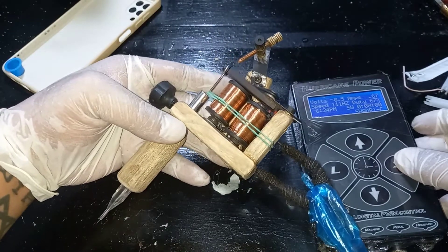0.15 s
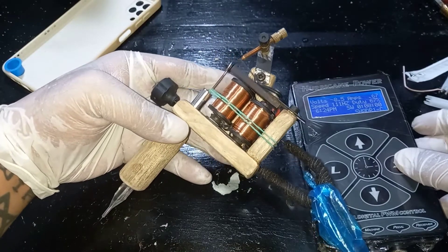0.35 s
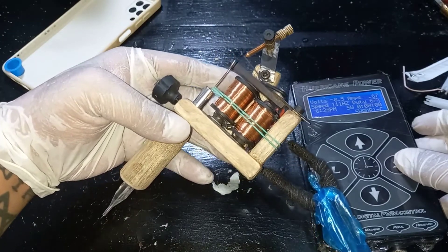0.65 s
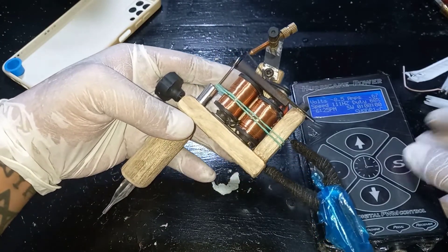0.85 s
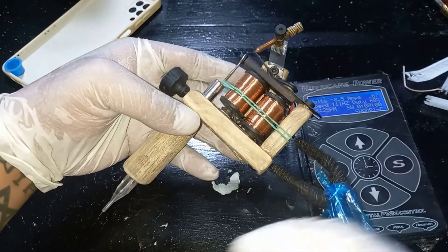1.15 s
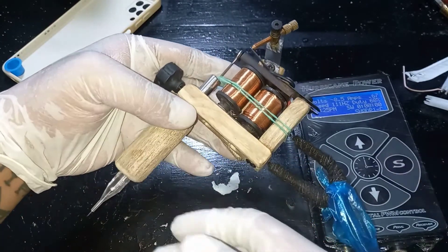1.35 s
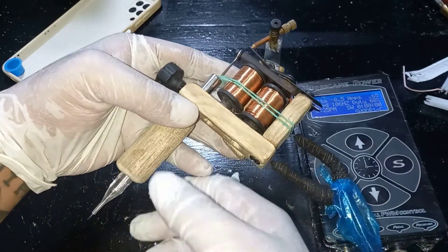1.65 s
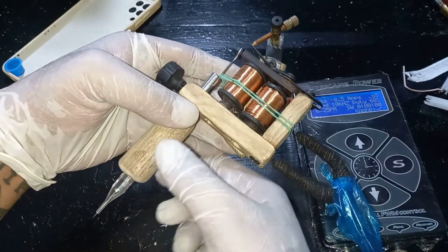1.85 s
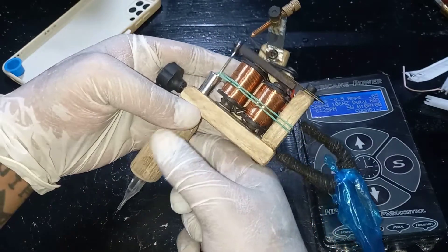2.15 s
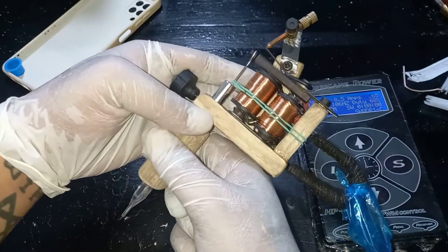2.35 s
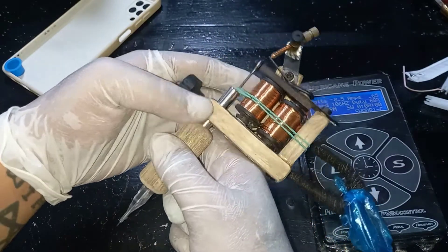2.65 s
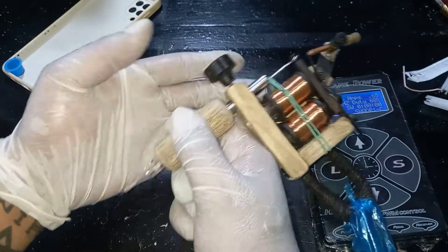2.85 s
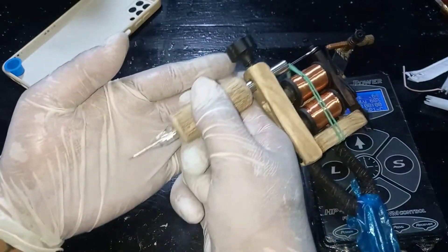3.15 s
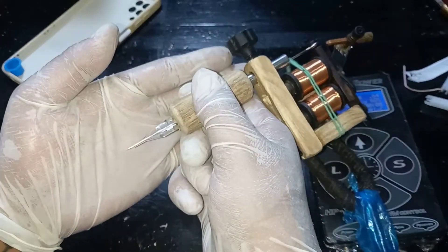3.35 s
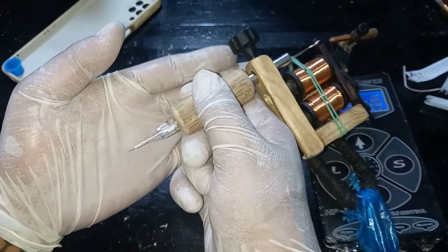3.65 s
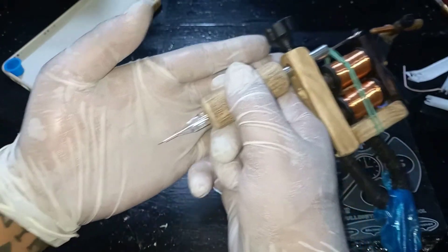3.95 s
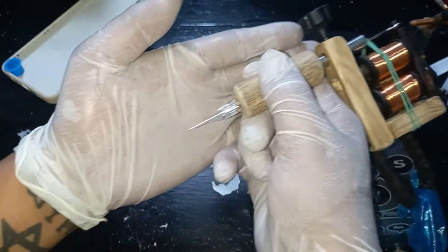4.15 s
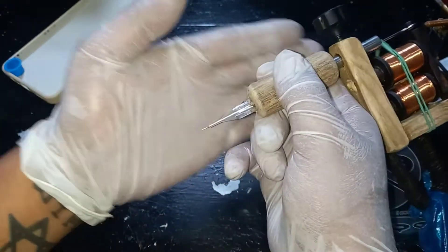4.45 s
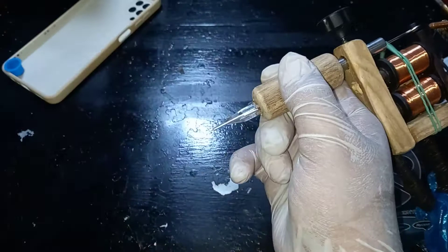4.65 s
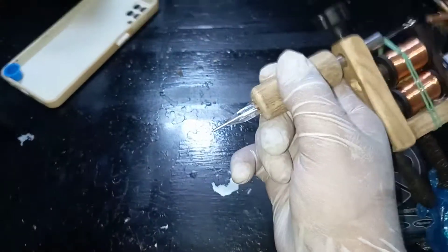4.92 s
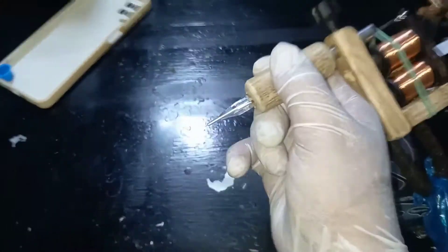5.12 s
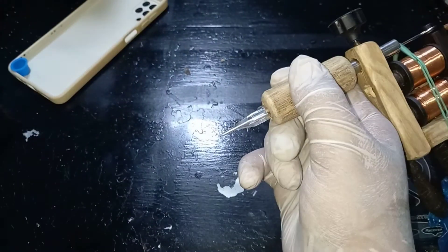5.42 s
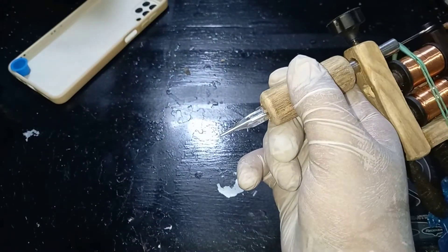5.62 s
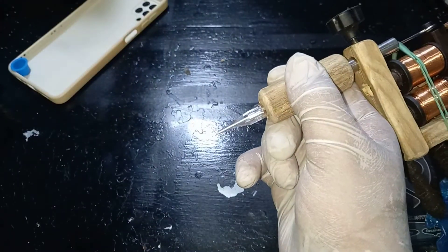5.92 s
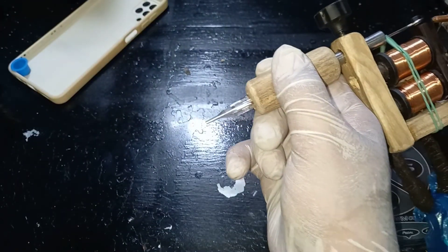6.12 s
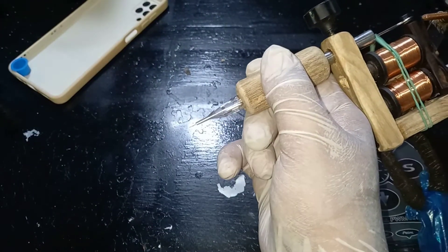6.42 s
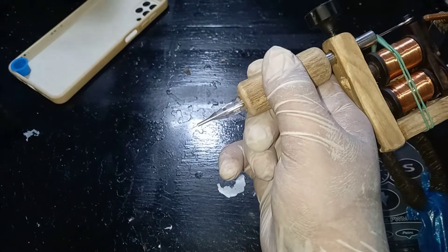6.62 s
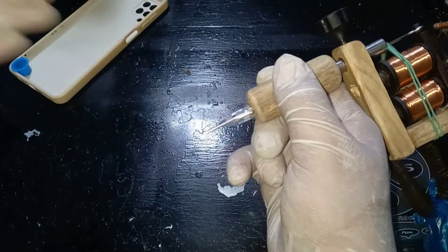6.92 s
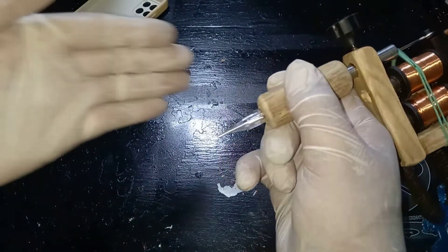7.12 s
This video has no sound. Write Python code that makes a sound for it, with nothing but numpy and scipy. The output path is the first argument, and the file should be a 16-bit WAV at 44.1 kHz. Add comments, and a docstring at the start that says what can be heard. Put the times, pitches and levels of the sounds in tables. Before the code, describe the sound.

From 0 s a coil tattoo machine is already running close to the microphone, a hard, raspy buzz of about 107 strikes a second with low hum beneath and a strong, bright metallic sizzle above. Around 1-1.3 s it is tilted and the colour shifts, a thin high whine of the frame sliding down and up again until about 2.5 s. From 2.5 to 3.2 s the other hand takes and turns it; the buzz sags to about 102 a second and the sizzle flares briefly, then weakens. Until 4.4 s it holds a thinner tone, then from 4.7 s, firmly gripped, the hum drops and the buzz stays steady, with small swells of rattle. One dull, soft knock on the bench falls at 4.9 s. Irregular puffs of low air rumble and faint hoots touch the microphone throughout. The room is quiet; the buzz continues to the end at 7.3 s.

```python
"""A coil tattoo machine buzzes in the hand over a workbench, close to the microphone. Its armature strikes the
coil cores a little over 100 times a second; each blow rings spring and frame. The machine is turned and gripped
by the other hand, which slows it and changes its colour. A draught buffets the microphone with rumble and
flutter; now and then narrow bands of noise hoot faintly. One dull knock on the bench is a scuff of noise with
decaying modes; a quiet room noise lies under all."""
import sys
import numpy as np
from scipy import signal
from scipy.fft import rfft, irfft
from scipy.io import wavfile
from scipy.ndimage import uniform_filter1d

SR = 44100
rng = np.random.default_rng(int(sys.argv[2]) if len(sys.argv) > 2 else 0)


def persist_wave(psi):
    """Save psi, clipped to +-1, as 16-bit WAV."""
    counts = np.round(np.clip(psi, -1, 1) * 32767).astype(np.int16)
    wavfile.write(sys.argv[1], SR, np.atleast_2d(counts).T)


N = 321048
TIME = np.arange(N) / SR

# how the machine is held, gliding between holds: t/s, hold (0 side on, 1 tilted, 2 turning, 3 palm, 4 gripped)
HOLD_CURVE = [(1.0, 0), (1.25, 1), (2.35, 1), (2.75, 2), (3.2, 3), (4.4, 3), (4.7, 4)]
# the hand is never quite still, so the beamed rings swell and fade
SWAY_PER_S, RATTLE_SWAY_DB, RING_SWAY_DB = 15, .45, .5
# borders of the bands: clang of the needle bar, then rings of frame and spring
CLANG_FROM_HZ, CLANG_TO_HZ, FRAME_HZ, SPRING_HZ = 1900, 3150, 7600, 12000


def amp(db):
    """Decibels to gain."""
    return 10 ** (np.asarray(db) / 20)


def unit(x):
    """Scales to rms 1."""
    return x / np.sqrt(np.mean(x ** 2) + 1e-20)


def follow(rows, axis=1):
    """One column of a curve at every sample."""
    rows = np.asarray(rows, float)
    return np.interp(TIME, rows[:, 0], rows[:, axis])


def causal(gain):
    """Gives a magnitude response the phase of a real resonator, which rings only after the blow."""
    lags = irfft(np.log(gain + 1e-6))
    half = lags.shape[-1] // 2
    fold = np.r_[1, np.full(half - 1, 2), 1, np.zeros(half - 1)]
    return np.exp(rfft(lags * fold))


def tint(x, points):
    """Filters by a spectrum of (f/Hz, gain/dB) points, joined along log frequency."""
    hz, db = np.transpose(points)
    grid = np.fft.rfftfreq(8192, 1 / SR)
    gain = amp(np.interp(np.log(grid + 1), np.log(hz + 1), db))
    return signal.oaconvolve(np.atleast_2d(x), irfft(causal(gain))[None], axes=1)[:, :N]


def cut(x, hz, kind, order=8):
    """High-pass or low-pass without delay."""
    return signal.sosfiltfilt(signal.butter(order, hz, kind, fs=SR, output="sos"), x)


def resonate(x, hz, width_hz):
    """A resonance that follows a curve of pitch: shift down to zero, smooth, shift back up."""
    turn = np.exp(2j * np.pi * np.cumsum(hz) / SR)
    r = np.exp(-np.pi * width_hz / SR)
    return 2 * (turn * signal.lfilter([1 - r], [1, -r], x / turn)).real


def steady(x, size=4400):
    """Holds the short-time rms of the middle of a pair at 1."""
    power = uniform_filter1d(uniform_filter1d(x.mean(0) ** 2, size), size)
    return x / np.sqrt(abs(power) + 1e-14)


def wander(per_s):
    """Slow chance of rms 1, with per_s random knots a second joined by straight lines."""
    knots = rng.standard_normal(2000)
    return unit(np.interp(TIME * per_s, np.arange(len(knots)), knots))


def air(colour, alike):
    """Coloured noise at two microphone ports; alike is the shared part of the power."""
    shared, left, right = rng.standard_normal((3, N))
    alike = np.clip(alike, 0, 1)
    return tint(np.sqrt(alike) * shared + np.sqrt(1 - alike) * np.array([left, right]), colour)


def blows(turns, scatter_db, jitter_us):
    """One sharp click at each whole turn, each a little different in force and time."""
    at = np.interp(np.arange(1, int(turns[-1])), turns, np.arange(N))
    force, slip = rng.standard_normal((1000, 2))[:len(at)].T
    at = at + slip * jitter_us * SR / 1e6
    # a windowed sinc places each click between samples
    index = at.astype(int)[:, None] + np.arange(-16, 17)
    offset = index - at[:, None]
    click = np.sinc(offset) * np.cos(np.pi * offset / 36) ** 2
    clicks = amp(scatter_db * force)[:, None] * click
    return np.bincount(np.clip(index, 0, N - 1).ravel(), clicks.ravel(), N)


def quiet_room():
    """A steady bed of soft, darkened noise, half shared by the two ports."""
    room_colour = [(300, 0), (1500, -8), (15000, -25)]  # spectrum of the room: f/Hz, gain/dB
    return amp(-48) * unit(air(room_colour, alike=.5))


def knocks(scuff_db=-7, scuff_s=0.005):
    """A dull blow of the hand or cord scuffs the bench and rings its modes, which die away exponentially."""
    # knocks on the bench: t/s, level/dB
    knock_rows = [(4.941, -25)]
    # modes of the bench: f/Hz, level against the knock/dB, t60/s
    bench_modes = [(215, -1, .1), (335, 0, .07), (450, -2, .05), (850, -7, .03)]
    out = np.zeros(N)
    scuff = cut(rng.standard_normal(N), 1300, "low", order=2)
    scuff = unit(cut(scuff, 210, "high", order=2))
    for s, db in knock_rows:
        t = np.maximum(TIME - s, 0)
        for hz, mode_db, t60 in bench_modes:
            decay_db = 60 * np.minimum(t / t60, 3)
            out += amp(db + mode_db - decay_db) * np.sin(2 * np.pi * hz * t)
        out += amp(db + scuff_db) * scuff * (t > 0) * np.exp(-t / scuff_s)
    return out * amp([[0], [-4]])  # softer at the right port


def hoots(width_hz=45):
    """A narrow, unsteady band of noise hoots briefly."""
    # faint low hoots, narrow bands of noise: start/s, end/s, f/Hz, level at the top of the swell/dB
    hoot_rows = [(0.033, 0.287, 218, -38.5), (1.874, 2.11, 230, -36.5), (2.92, 3.26, 247, -34.5),
                 (4.052, 4.404, 151.6, -39.5), (4.27, 4.48, 342, -42), (4.52, 4.864, 310, -38.5)]
    out = np.zeros(N)
    for start, end, hz, db in hoot_rows:
        swell = np.sin(np.pi * np.clip((TIME - start) / (end - start), 0, 1))
        pitch = np.full(N, hz)
        hollow = resonate(rng.standard_normal(N), pitch, width_hz)
        hollow = resonate(hollow, pitch, width_hz)
        out += amp(db) * swell * steady(hollow[None])[0]
    return out


def puff(start, length, db, attack_s=0.01, release_s=0.0046):
    """Strength of one puff: it rises, holds and dies away."""
    t = TIME - start
    return amp(db) * np.clip(t / attack_s, 0, 1) * np.exp(-np.maximum(t - length, 0) / release_s)


def draught(turns):
    """Puffs of low rumble that throb in step with the blows, with a higher flutter of their own."""
    # separate puffs of air on the microphone: start/s, length/s, strength before the lumps/dB
    puff_rows = [(0.0, 0.027, -41.5), (0.177, 0.062, -38.5), (0.587, 0.06, -23.5), (0.68, 0.13, -35.5),
                 (0.961, 0.092, -34), (1.146, 0.12, -28), (1.281, 0.23, -27.5), (1.633, 0.12, -30.5),
                 (1.784, 0.17, -33.5), (1.993, .12, -39), (2.225, 0.13, -26.5), (2.46, 0.065, -31.5),
                 (2.62, 0.14, -29.5), (2.774, 0.21, -32), (3.055, 0.25, -34.5), (3.467, 0.22, -39),
                 (3.733, 0.082, -35.5), (3.887, 0.093, -33), (4.293, 0.35, -33.5), (4.778, 0.45, -37.5),
                 (5.344, .08, -32), (5.44, 0.26, -38.5), (5.692, 0.34, -36.5), (6.038, 0.24, -32.5),
                 (6.332, 0.2, -32), (6.56, 0.15, -36), (6.878, 0.12, -37.5), (7.18, .055, -39.5)]
    # the breeze under the puffs: t/s, strength before the lumps/dB
    breeze_curve = [(0, -35.5), (.4, -56), (1.1, -46.5), (7.28, -40.5)]
    # spectra of the thump and of the flutter: f/Hz, gain/dB
    gust_colour = [(20, -26), (60, -1.5), (100, 4.5), (150, -4), (220, -26), (900, -55)]
    flutter_colour = [(100, -63.5), (200, 6), (250, 0), (340, -4.5), (450, -20.5), (1500, -58)]
    # eddies break the wind into lumps with short lulls; a light breeze more so than a puff (depths 0-1)
    eddies_per_s, puff_depth, breeze_depth = 30, .6, .85
    # the rumble that throbs with the blows, against its random part
    throb_db = -6
    # flutter level at the usual wind, and dB gained per dB of wind: it grows more slowly than the thump
    flutter_db, usual_wind_db, flutter_growth = -41.5, -35, 0.56

    eddies = abs(wander(eddies_per_s))
    puff_lumps = unit(1 + puff_depth * (eddies - 1))
    breeze_lumps = unit(1 + breeze_depth * (eddies - 1))
    puffs = puff_lumps * sum(puff(*row) for row in puff_rows)
    wind = np.hypot(puffs, breeze_lumps * amp(follow(breeze_curve)))

    throb = tint(blows(turns, scatter_db=4, jitter_us=300), gust_colour)
    throb = unit(cut(throb, 40, "high", order=2))
    rumble = unit(air(gust_colour, alike=0.22)) + amp(throb_db) * throb
    gusts = wind * steady(rumble, size=800)
    flutter_strength = amp(flutter_db) * (wind / amp(usual_wind_db)) ** flutter_growth
    flutter = flutter_strength * steady(air(flutter_colour, alike=0.23))
    return gusts * amp([[-.8], [.8]]) + flutter  # the thump leans to the right


def hum(turns, port_turn=0.09, spread=.11):
    """The blows shake the whole frame: low harmonics, rebalanced and mostly damped by a firm grip."""
    # harmonics: multiple of the speed, level held loosely/dB, level held firmly/dB (before the hum's gain)
    harmonics = [(4, -53, -53.5), (5, -59, -64), (6, -59, -66), (7, -50, -54), (8, -51, -48.5),
                 (9, -47, -60), (10, -48.5, -55), (12, -51.5, -54), (14, -58, -61), (15, -60, -58)]
    # gain of the whole hum: t/s, gain/dB
    hum_gain = [(0, -1), (2.35, 1), (4.3, -.5), (4.7, -5.5), (6.2, -4), (7.28, -6.5)]
    rough_depth, rough_per_s = .15, 200  # each harmonic trembles
    firm = np.clip(follow(HOLD_CURVE) - 1, 0, 1)
    out = np.zeros((2, N))
    for k, loose_db, firm_db in harmonics:
        height = amp(loose_db + firm * (firm_db - loose_db)) * (1 + rough_depth * wander(rough_per_s))
        # the ports differ more for short waves
        lag = port_turn * np.array([[1], [-1]]) * k / len(harmonics)
        # the frame passes each harmonic on a little early or late
        late = spread * rng.standard_normal()
        out -= height * np.sqrt(2) * np.cos(2 * np.pi * (k * turns + lag + late))
    return out * amp(follow(hum_gain))


def ring_shape(size=4096):
    """Amplitude after a blow: a crack of half a millisecond, then steel, bench and room ring on."""
    t = np.arange(size) / SR - .001  # the crack peaks 1 ms (44 samples) in
    after = np.maximum(t, 0)
    # these three are powers
    crack = np.exp(-(t / .00044) ** 2)
    steel = amp(2 * -9) * np.exp(-after / .0018)
    room = amp(2 * -26.5) * np.exp(-after / .03)
    return np.sqrt(crack + (t > 0) * (steel + room))


def radiate(clicks, patchy_db=1.4, count=48, size=8192):
    """Dense steel modes and reflections: some last, the rest drift as the hand moves."""
    shape = ring_shape()
    lasting = .5  # share of the power
    noise = rng.standard_normal((count + 1, 2, len(shape)))
    mixed = np.sqrt(lasting) * noise[0] + np.sqrt(1 - lasting) * noise[1:]
    paths = rfft(shape * mixed, size)
    # flatten the broad colour and leave the fine modes
    paths /= causal(np.sqrt(uniform_filter1d(abs(paths) ** 2, size=70)))
    # finger pressure damps now one group of modes, now another
    patches = unit(uniform_filter1d(rng.standard_normal((count, 1, paths.shape[-1])), size=90))
    paths = irfft(paths * causal(amp(patchy_db * patches)), size)
    paths = np.roll(paths, 64, -1)[..., :len(shape)]
    # glide from one set of modes to the next
    place, out = np.linspace(0, count - 1, N), np.zeros((2, N + size))
    for k, path in enumerate(paths):
        a, b = np.searchsorted(place, [k - 1, k + 1])
        fade = np.cos(np.pi / 2 * (place[a:b] - k))
        part = signal.fftconvolve((clicks[a:b] * fade)[None], path, axes=1)
        out[:, a:a + part.shape[1]] += part
    # the crack lands on the click, and reaches the right port 8 samples later
    return unit(np.array([out[0, 108:108 + N], out[1, 100:100 + N]]))


def strike(turns, return_db=-17, early_db=-5):
    """The armature hits the cores, bounces once, and springs back against the contact screw."""
    # loose parts rasp most in the middle range: f/Hz, gain against the blows/dB
    chatter_colour = [(1500, -8), (7000, -3), (12000, -8)]
    # below the frame's ring each crack is double: a duller crack leads by a slightly varying part of a cycle
    early_lead, lead_wobble = .035, .08  # lead in cycles, and the share by which it varies
    down = blows(turns, scatter_db=.9, jitter_us=5)
    early_turns = turns + early_lead * (1 + lead_wobble * wander(30))
    early_crack = blows(early_turns, scatter_db=2, jitter_us=8)
    # bounce and return, in cycles after the blow
    back = sum(blows(turns - part, scatter_db=3, jitter_us=20) for part in (.27, .78))
    # needle bar and loose parts rasp anew after each blow and never quite come to rest
    shaken = abs(signal.oaconvolve(down ** 2, ring_shape() ** 2)[40:40 + N])
    rasp = unit(np.sqrt(shaken + .45 * shaken.mean()) * rng.choice([-1, 1], (2, N)))
    hits = radiate(down + amp(early_db) * cut(early_crack, FRAME_HZ, "low"))
    return hits + amp(return_db) * radiate(back, count=12) + tint(rasp, chatter_colour)


def colour_by_hold(steel, hold):
    """Each hold shows another side of the machine, so the blows glide from colour to colour."""
    # colour of the blows in each hold, from side on to gripped: f/Hz, gain/dB
    side_on = [(1700, -9.5), (2650, 2), (3100, -11.5), (4050, 6), (4550, -1.5), (5200, -3), (5950, 1.5),
               (7100, -10.5), (8900, 3.5), (9900, 14.5), (11800, 7.5), (13100, 8.5), (15700, 7)]
    tilted = [(1650, -13.5), (2750, 5.5), (3100, -8), (3750, 2.5), (4750, -1.5), (6100, 3), (7250, -11),
              (8500, 9), (10300, 9), (12000, 0), (13050, 5.5), (13900, 0), (15000, 1)]
    turning = [(2400, -9), (2950, -10), (4600, 0), (5300, 3), (5900, -9), (7200, -7), (8700, 4),
               (11300, -9), (12500, 2), (14000, -1), (15700, -3)]
    on_palm = [(1650, -15.5), (1900, 0), (2850, 0.5), (3400, -11.5), (4300, 2.5), (6000, -12), (7400, -9),
               (7900, 0.5), (11500, 0.5), (12300, 8), (13600, 5.5), (15700, -4)]
    gripped = [(1750, -17), (2050, -2.5), (2600, -4.5), (3100, -11.5), (4650, -1), (5600, -13.5),
               (7000, -11.5), (7900, 0), (9450, 2), (9850, -2.5), (10600, 4), (11700, 2.5), (12500, 11.5),
               (13700, 7.5), (14300, 6), (15700, -4.5)]
    colours = [side_on, tilted, turning, on_palm, gripped]
    return sum(np.maximum(1 - abs(hold - k), 0) * unit(tint(steel, colour))
               for k, colour in enumerate(colours))


def beam(ring, db):
    """Holds one ring at its level, swaying a little with the hand."""
    return amp(db + RING_SWAY_DB * wander(SWAY_PER_S)) * steady(ring)


def rattle(turns, whine_width_hz=1500):
    """The struck steel, split into body, clang and the beamed rings of frame and spring."""
    # level of the frame's ring in each hold, in hold order: level/dB
    frame_levels = [-25, -27.5, -24.5, -29, -28]
    # rattle of the body, outside the clang and below the frame's ring: t/s, level/dB
    body_curve = [(0.6, -30), (1.1, -28.5), (2.2, -28.5), (2.9, -33), (4.2, -32), (5.4, -32.5),
                  (6.25, -36.5), (6.6, -31.5)]
    # metallic band between about 2 and 3 kHz: t/s, level/dB
    clang_curve = [(0.0, -37), (0.75, -42), (2.4, -36), (2.75, -44.5), (4.4, -34.5), (4.7, -39),
                   (5.25, -43.5), (5.75, -37.5), (6.3, -36), (6.55, -44), (7.0, -39.5)]
    # a narrow ring of the frame slides as the machine is tilted and turned: t/s, f/Hz, level/dB
    whine_curve = [(0.9, 9270, -27.5), (1.6, 8550, -35), (1.92, 9250, -28.5), (2.2, 9650, -29),
                   (2.48, 8600, -36.5), (2.75, 9200, -35), (3.3, 9300, -48)]
    # the spring's ring above 12 kHz: t/s, level/dB
    spring_curve = [(0.0, -18.5), (0.99, -19), (1.88, -20.5), (2.51, -16), (2.72, -22.5), (2.84, -19.5),
                    (3.0, -23.5), (4.74, -23), (5.09, -22.5), (5.21, -25), (5.33, -22.5), (5.84, -24.5),
                    (6.63, -21.5), (7.28, -26)]

    steel = strike(turns)
    hold = follow(HOLD_CURVE)
    sound = colour_by_hold(steel, hold)
    low, spring = cut(sound, FRAME_HZ, "low"), cut(sound, SPRING_HZ, "high")
    frame = sound - low - spring
    clang = cut(cut(low, CLANG_TO_HZ, "low"), CLANG_FROM_HZ, "high")
    body = cut(low - clang, 600, "high", order=2)
    whine_hz = follow(whine_curve)
    whine = resonate(resonate(steel, whine_hz, whine_width_hz), whine_hz, whine_width_hz)

    frame_db = np.interp(hold, np.arange(len(frame_levels)), frame_levels)
    rings = beam(frame, frame_db) + beam(whine, follow(whine_curve, axis=2))
    rings = rings + beam(spring, follow(spring_curve))
    middle = beam(body, follow(body_curve)) + beam(clang, follow(clang_curve))
    # the rings lean more and more to the left
    lean_db = follow([(1.5, .35), (4, 1)])
    return amp(RATTLE_SWAY_DB * wander(SWAY_PER_S)) * (middle + rings * amp([lean_db, -lean_db]))


def scene():
    """The machine, the draught, hoots, a knock and a quiet room."""
    # speed of the armature, before a slight unsteadiness: t/s, rate/(blows/s)
    speed_curve = [(0.0, 106.73), (0.3, 107.04), (0.8, 107.06), (1.5, 106.35), (2.2, 107.28),
                   (2.45, 107.13), (2.57, 104.69), (2.9, 103.62), (3.12, 101.95), (3.6, 101.64),
                   (4.15, 102.18), (4.55, 101.66), (6.0, 101.46), (6.75, 101.31), (7.02, 102.18),
                   (7.28, 101.72)]
    speed = follow(speed_curve) * (1 + .0012 * wander(40))
    turns = .46 + np.cumsum(speed) / SR  # cycles of the armature so far
    return quiet_room() + knocks() + hoots() + draught(turns) + hum(turns) + rattle(turns)


def record(dry):
    """Peaks stop at full scale; then a steep low-pass limits the band."""
    band_limit = signal.firwin(801, 15850, window=("kaiser", 9), fs=SR)  # cutoff in Hz
    return signal.oaconvolve(np.clip(dry, -1, 1), band_limit[None], "same")


dry = scene()
out = record(dry)
persist_wave(out)
```